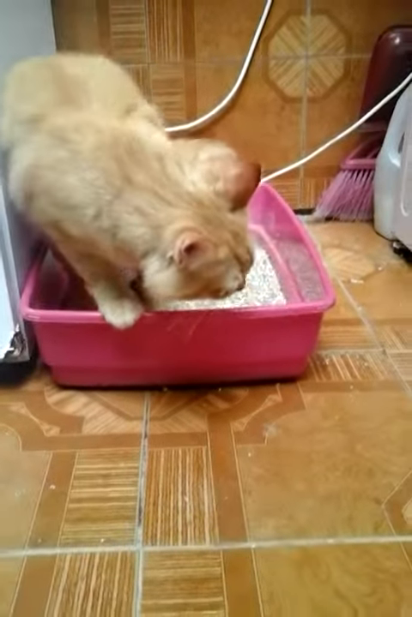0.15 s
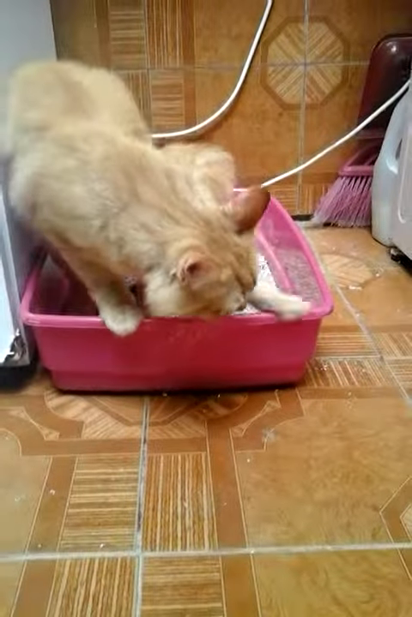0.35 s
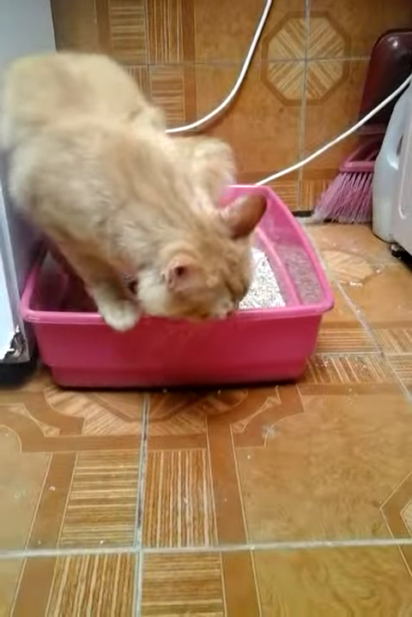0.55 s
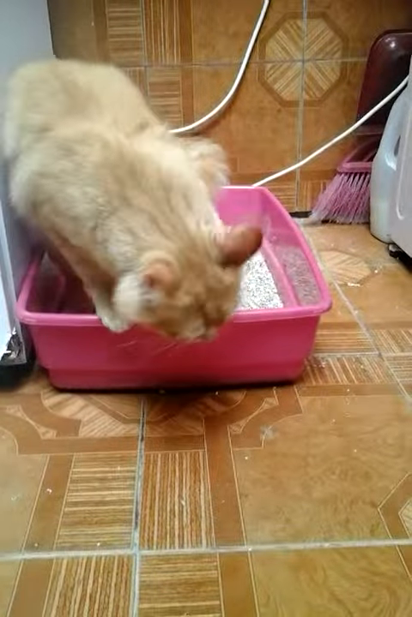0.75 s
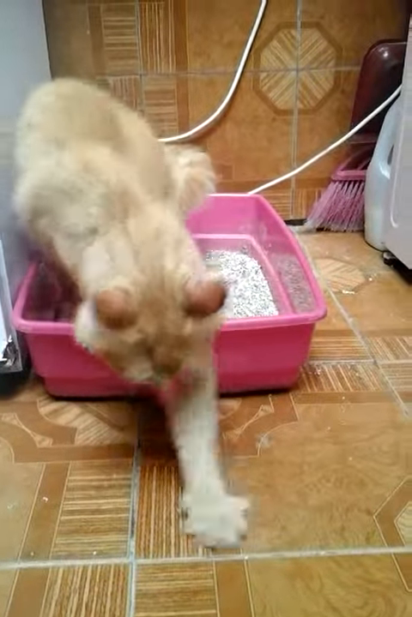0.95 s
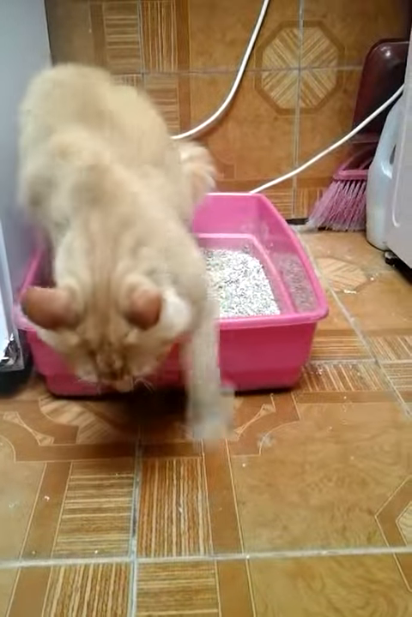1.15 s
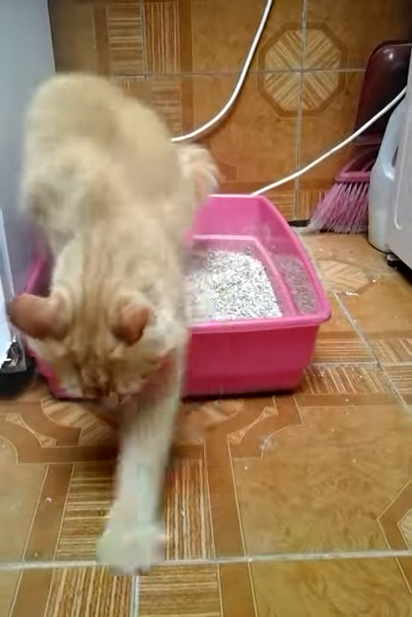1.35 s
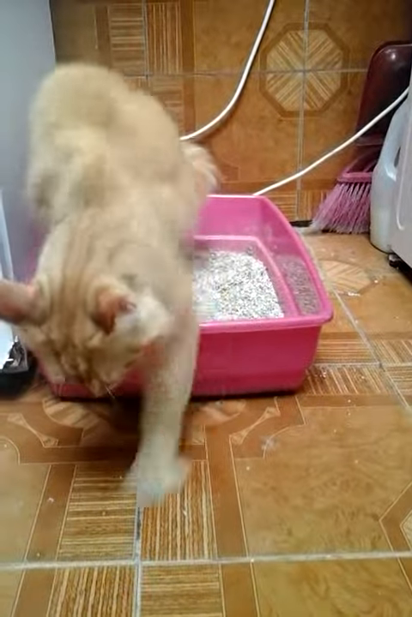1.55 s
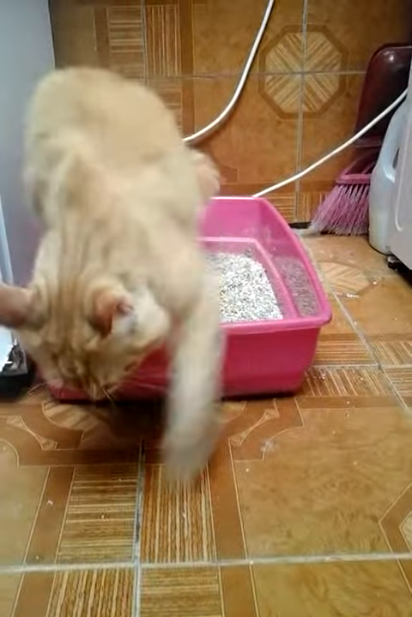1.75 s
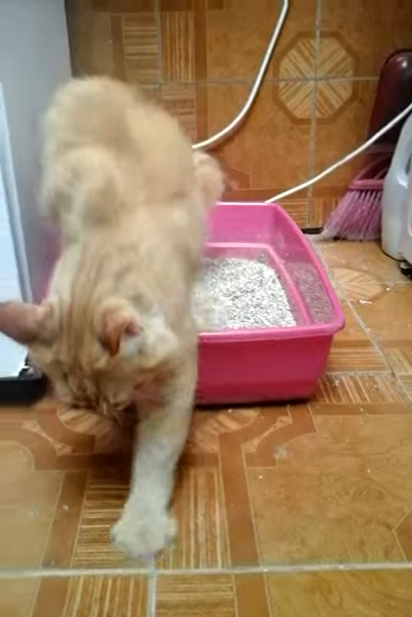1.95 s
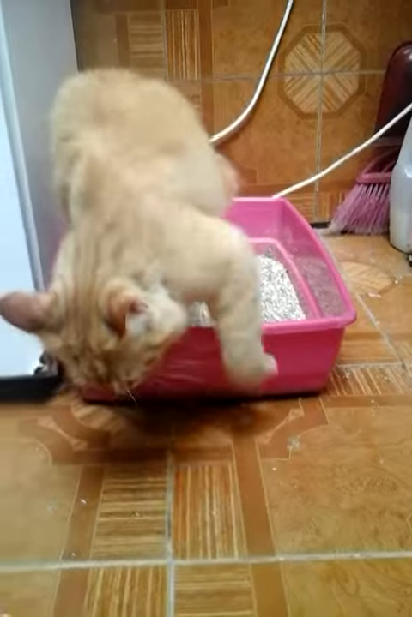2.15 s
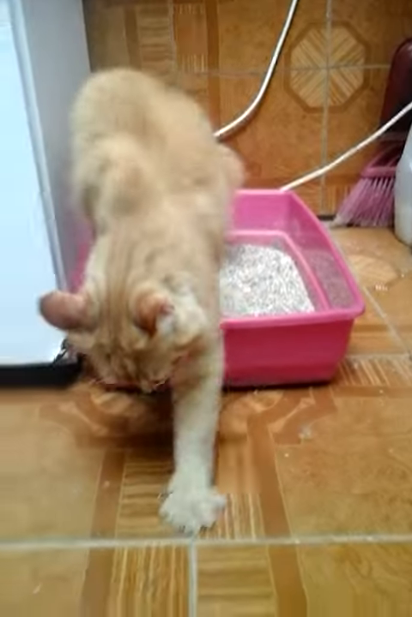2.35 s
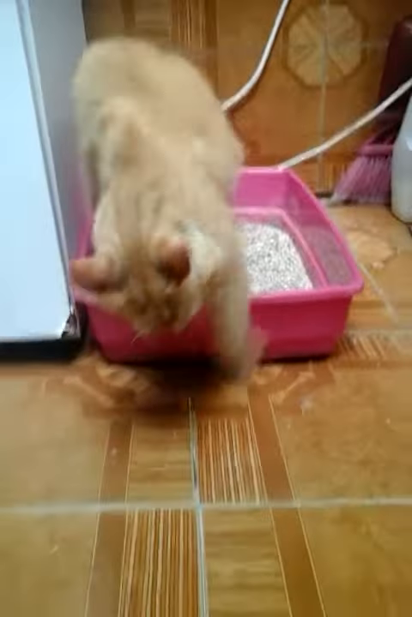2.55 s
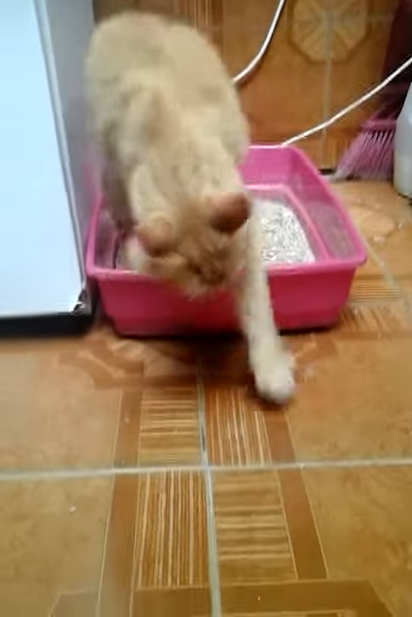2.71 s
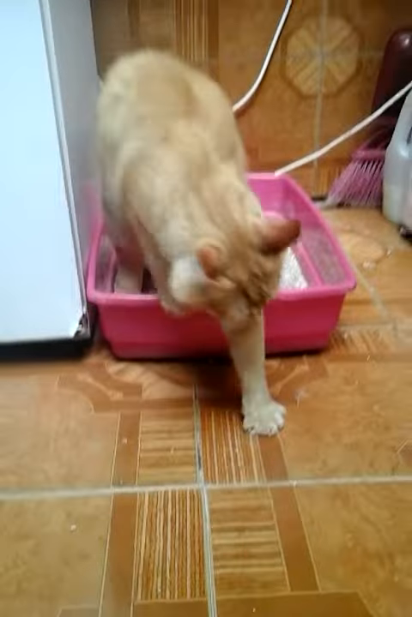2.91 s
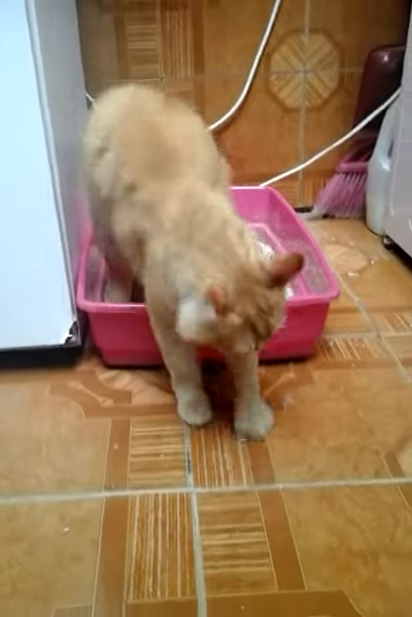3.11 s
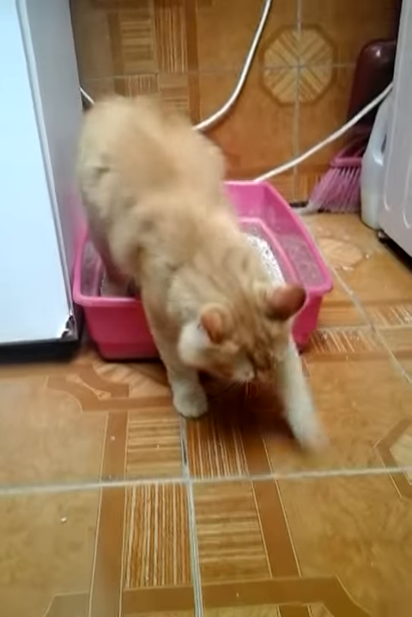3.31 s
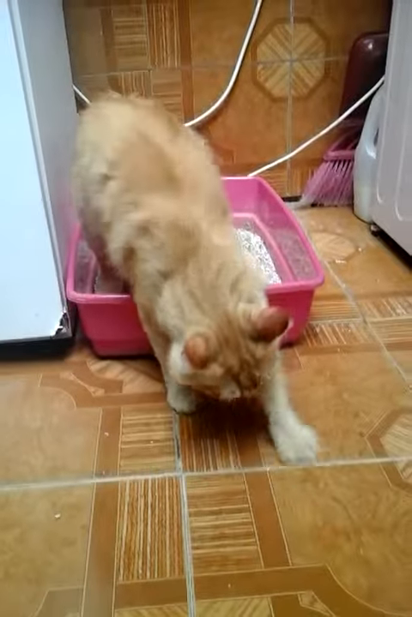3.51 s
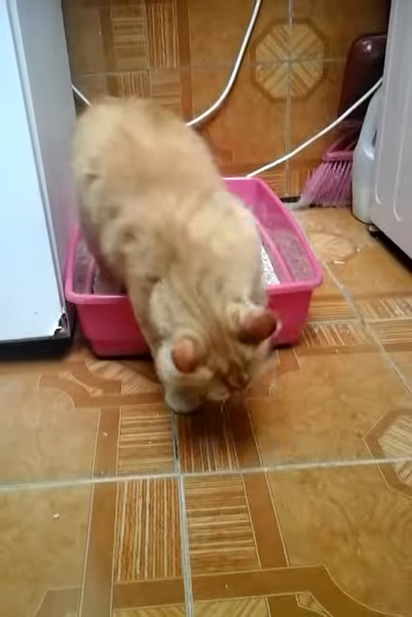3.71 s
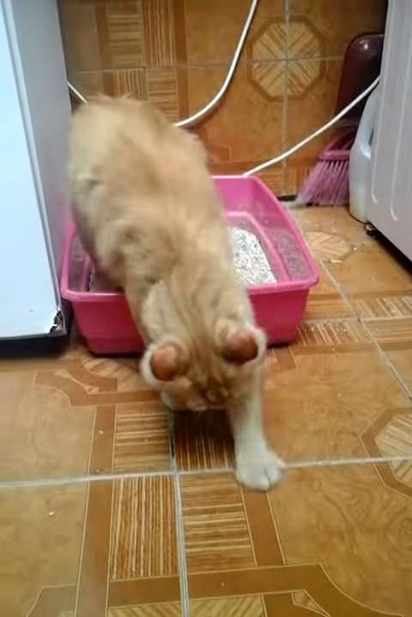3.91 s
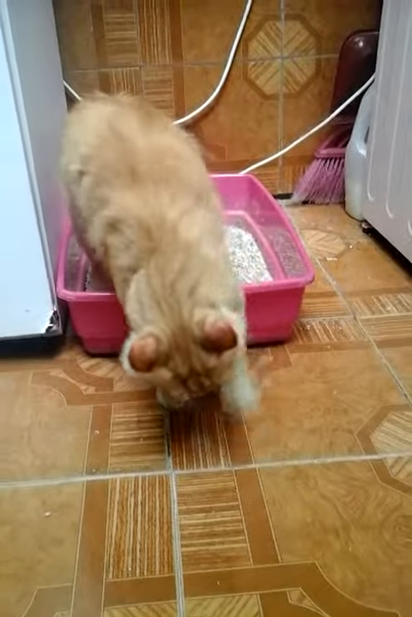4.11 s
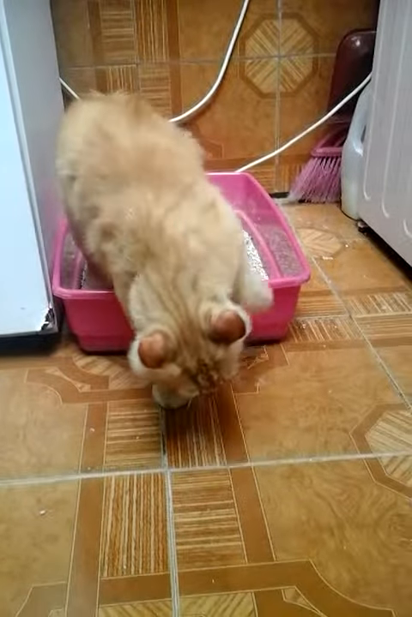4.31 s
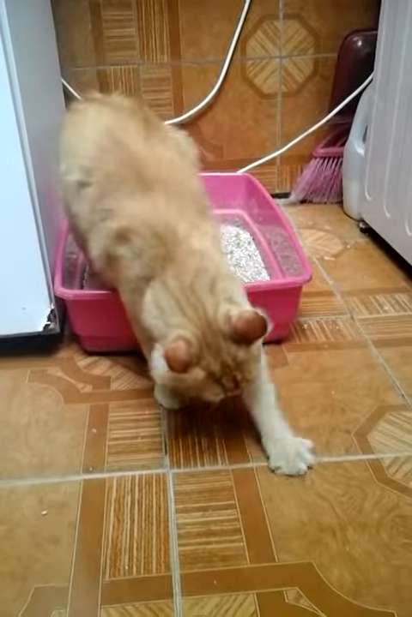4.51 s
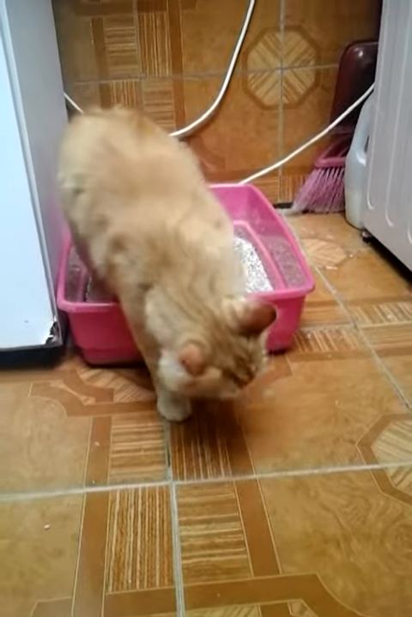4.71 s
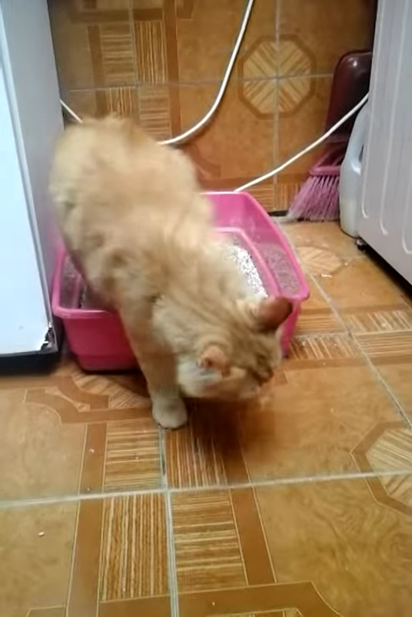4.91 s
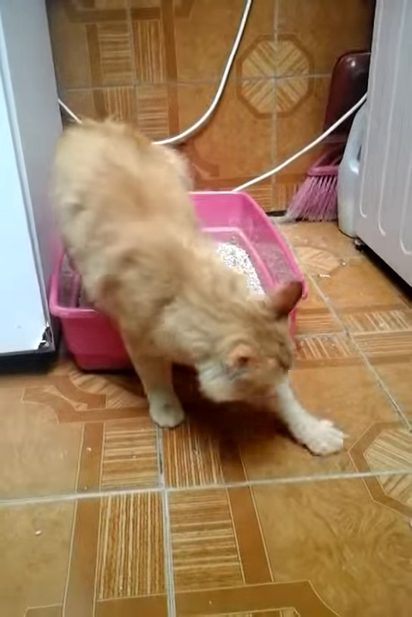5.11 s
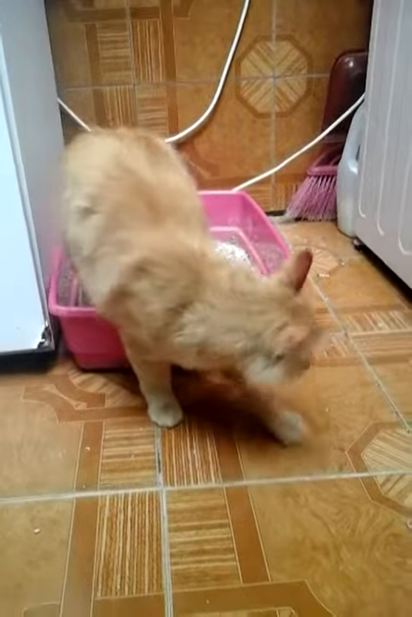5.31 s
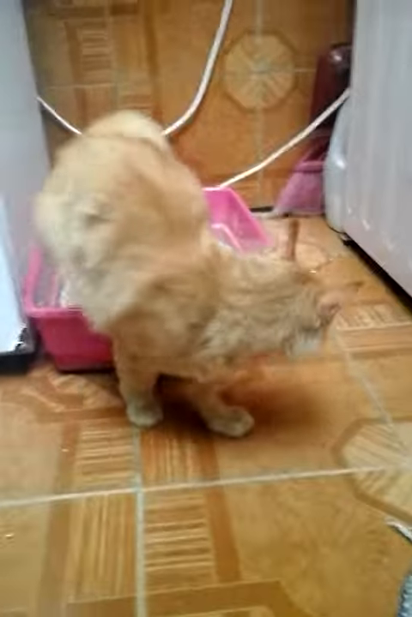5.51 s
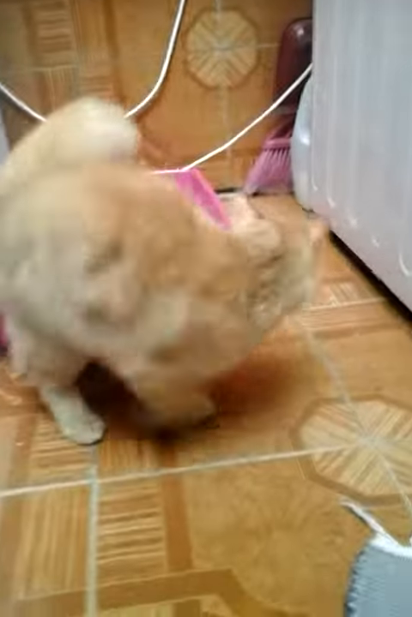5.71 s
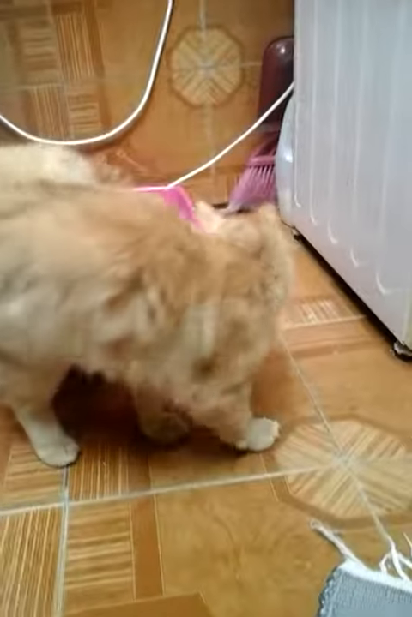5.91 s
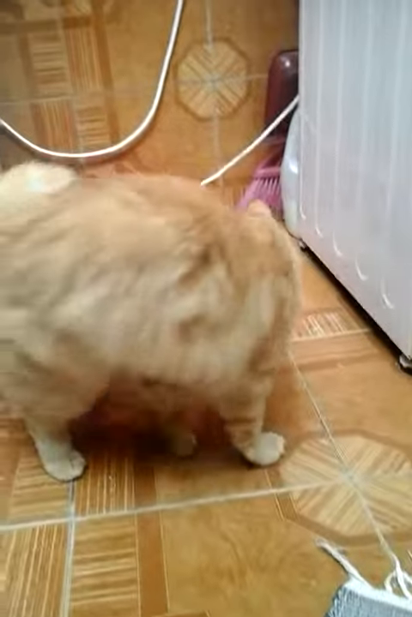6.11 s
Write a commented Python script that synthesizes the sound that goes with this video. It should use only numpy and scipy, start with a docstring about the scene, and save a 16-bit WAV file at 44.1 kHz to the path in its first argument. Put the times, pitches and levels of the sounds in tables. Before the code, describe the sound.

Close up in a small tiled room, a cat briefly crunches litter in a plastic tub. Then its paw sweeps faintly across the tiles, again and again, most strokes ending in a hollow plastic knock. The knocks grow stronger, peaking past the middle, then stop; a few claw taps and a faint scuff follow as it steps out. Low room rumble and slight hiss lie underneath.

```python
"""Cat in a litter tub

A cat in a plastic tub in a small tiled room shuffles litter, then sweeps a paw over the tiles; most sweeps
end in a hollow knock: a soft push filtered by contact and wall, ringing tub modes and room.
Claws are short noise bursts; paw and litter are grains over noise; a low rumble and faint hiss lie below.
Late claw taps and a scuff follow as it steps out. Two microphone ports of opposite polarity hear it."""
import sys
import numpy as np
from scipy import signal
from scipy.fft import rfft, irfft
from scipy.io import wavfile

SR = 44100
rng = np.random.default_rng(int(sys.argv[2]) if len(sys.argv) > 2 else 0)


def to_wav(sig):
    """Store sig (one row per channel, or 1-D mono) as 16-bit WAV at the path in sys.argv[1].

    Samples outside -1..1 are clipped; the rate is SR.
    """
    pcm = np.clip(np.atleast_2d(sig), -1, 1) * 32767
    pcm = np.round(pcm).astype(np.int16)
    wavfile.write(sys.argv[1], SR, pcm.T)  # frames by channels


N = 275757
TIME_S = np.arange(N) / SR
FREQ_HZ = np.maximum(np.fft.rfftfreq(N, 1 / SR), 1)
RING_TIME_S = TIME_S[:SR * 3 // 4]

# Paw blows on the tub, some as contacts a few ms apart:
# start_s, relative_level_db, treble_fall_db_per_octave, wall_spot_hz, spot_lift_db, bottom_share_db
KNOCKS = [(.128, -37.5, 20, 378, 9, 3), (.545, -41, 12, 403, 3, 10), (1.2571, -23.5, 29, 403, 0, 10),
          (1.2621, -19.5, 24.5, 573, -15, 5), (1.7139, -15, 21, 527, 7.5, 8),
          (1.7173, -22, 17, 790, 14.5, -14), (2.0216, -34, 6, 1200, 2, 0),
          (2.1565, -10.5, 39, 740, 7.5, 13), (2.1611, -17, 6.5, 1525, 17, 2),
          (2.6339, -13.5, 25, 830, 4.5, 0), (3.273, -38.5, 20, 270, 6.5, 3),
          (3.6829, -5.5, 11, 1260, 12.5, -6.5), (3.6880, -1.5, 14, 438, 15, -7),
          (3.6894, 0.5, 21.5, 634, 5.5, -7), (4.2238, -3, 12.5, 936, 5.5, 1), (4.7734, -9, 14, 393, 12, -2),
          (4.7750, -17, 19, 612, 10, -1), (4.877, -23, 10, 1110, 8, -3)]
# Tub ring modes: mode_hz, relative_level_db, t60_s
TUB_MODES = [(360, -15, 0.22), (403.2, -15, .3), (533, -20.5, 0.34), (643.4, -1.5, .2), (804, -20.5, 0.62),
             (867, -18, .22), (918, -13.5, 0.26), (1176, -12.5, .27), (1277, -16.5, .3), (1324, -15, .3),
             (1540, -14.5, .12), (1680, -21, .12), (1932, -20.5, 0.28), (2182, -29, .27)]
# Modes of the loaded tub bottom: mode_hz, relative_level_db, t60_s
BOTTOM_MODES = [(181.4, -60, 0.47), (371, -59.5, .23)]
# Contact corner nears FIRM_HZ for firm blows and is half of it at GENTLE_DB
FIRM_HZ, GENTLE_DB = 1083, -34.5

# Claws catch the tub wall: start_s, relative_level_db, time_to_peak_s, left_minus_right_db, pitch_hz
WALL_CLAWS = [(2.156, -27, 0.00087, 0.5, 4730), (3.6787, -27.5, 0.00091, -2, 3400),
              (3.69, -31, 0.0015, 4, 6100), (4.2216, -43, 0.00035, -13, 3160),
              (4.7695, -20.5, 0.00074, 2.5, 6000), (4.8394, -35.5, .0032, 1, 5690)]
# Claws tap tiles or rim: start_s, relative_level_db, time_to_peak_s, left_minus_right_db
TILE_CLAWS = [(0.3545, -45, 0.00064, 1), (1.432, -53, 0.00082, 6), (1.9, -48, 0.0012, 4),
              (2.364, -43.5, .0008, -1), (3.609, -52, 0.0085, 10), (4.964, -30, 0.00054, -10),
              (5.195, -38, 0.00067, -3.5), (5.7866, -48.5, 0.0046, -15), (5.7967, -31.5, 0.00058, -9.5)]
# Granules click in the tub: start_s, relative_level_db, time_to_peak_s, left_minus_right_db
GRANULES = [(0.064, -44, 0.0021, 0), (0.087, -33.5, 0.00034, 10.5), (0.1, -37, 0.00056, 0),
            (0.3748, -41, .00087, -2), (0.505, -45, 0.0009, -3)]
WALL_CLAW_ROOM_DB = 3
TILE_CLAW_HZ, TILE_CLAW_ROOM_DB = 7790, -17
GRANULE_HZ, GRANULE_ROOM_DB = 5750, -5.5

# Paw sweeps over the tiles, gathering speed:
# start_s, length_s, relative_level_db, hiss_above_about_7_khz_db
SWEEPS = [(1.095, .07, -53, 3), (1.185, .05, -58, 5), (1.53, .11, -56, 3), (1.975, .135, -55.5, 3.5),
          (2.46, .08, -57.5, 2), (2.57, .035, -57, 5), (2.61, .14, -59.5, -2.5), (2.76, .09, -68, -1),
          (2.92, .08, -65.5, -5.5), (3.24, .06, -68.5, 5), (3.49, .135, -59, 4), (4.04, .12, -58, 2),
          (4.605, .085, -59.5, 5), (5.48, .1, -72.5, -7), (5.745, 0.044, -58, 3)]
# Paw lands or drags on the tub wall: start_s, length_s, relative_level_db, hiss_above_about_7_khz_db
SCUFFS = [(1.016, 0.039, -63.5, 3), (1.255, 0.0083, -52.5, -1.5), (1.528, 0.031, -57.5, -8),
          (1.71, 0.016, -58.5, 4.5), (2.018, 0.015, -54.5, -10), (2.155, 0.078, -57.5, -0.5),
          (3.187, .025, -64.5, 4.5), (3.43, 0.032, -63.5, 4), (3.69, 0.029, -47, 2.5),
          (4.222, 0.041, -53.5, -2), (4.312, 0.021, -52, -4.5), (4.838, 0.067, -52.5, -1.5),
          (5.19, 0.022, -62.5, 0.5), (6.078, 0.022, -66.5, 0)]
# Paw rub spectrum: freq_hz, gain_db
SWEEP_COLOUR = [(120, -1), (350, 0), (600, -6), (1100, -13), (2800, -12.5), (4200, -7), (4900, -5.5),
                (5450, -0.5), (6200, -3), (7500, -7), (10000, -11.5), (15000, -16.5)]
# Spectrum of the hiss lingering after each rub: freq_hz, gain_db
LINGER_COLOUR = [(150, 10), (330, 3), (1100, -7), (4000, -8), (5400, -4.5), (7500, -6), (15000, -9)]
SWEEP_ATTACK_SHARE, SWEEP_RELEASE_DB_PER_S = 0.95, 168.5
SCUFF_ATTACK_SHARE, SCUFF_RELEASE_DB_PER_S = 0.25, 233
LINGER_DB, LINGER_TIME_CONSTANT_S = 1, 0.28
PAW_LEFT_MINUS_RIGHT_DB = 1

# Paw stirs the litter: start_s, length_s, relative_level_db
STIRS = [(0, 0.051, -58), (.063, 0.044, -51), (.375, 0.064, -58), (.46, 0.092, -59), (.53, 0.016, -58.5)]
# Litter crunch spectrum: freq_hz, gain_db
LITTER_COLOUR = [(60, -8), (170, 9), (400, 0.5), (550, -5), (1000, -7.5), (1500, -10), (3200, -12),
                 (5200, -5), (7500, -8), (10000, -13), (15000, -17.5)]
STIR_ATTACK_SHARE, STIR_RELEASE_DB_PER_S, STIR_LINGER_DB = 0.11, 226, -9

# Tiled room tail by band: centre_hz, t60_s, relative_level_db
ROOM = [(222, 0.94, -2.5), (345, 0.51, 2.5), (505.4, 0.49, -3.5), (893, 0.46, -1), (1735, 0.43, 1),
        (3056, 0.47, -5), (5360, 0.22, -1), (9860, 0.23, -5.5)]
# Quiet room spectrum: freq_hz, gain_db
AIR = [(15, -32), (25, -4.5), (81, -1.5), (264, -13.5), (394, -19), (475, -21), (856, -25.5), (1150, -27.5),
       (1390, -30.5), (1860, -31.5), (2020, -32), (15000, -29.5)]
AIR_DB = -62.5

# Colour of the left microphone port: freq_hz, gain_db
LEFT_PORT = [(300, 0.5), (3500, 1.5), (4600, -4.5), (6800, -1), (10000, -3), (15000, -3.5)]
# Colour of the right microphone port: freq_hz, gain_db
RIGHT_PORT = [(150, -1), (500, -2.5), (1300, 1), (3800, -1.5), (5250, 3), (6200, -2.5), (7800, -5),
              (15000, -3.5)]
TOP_HZ = 14750


def knocks(spot_q=7.6, radiate_hz=290, pad_hz=8000):
    """A soft pad pushes the wall: the harder the blow, the higher the corner of the push."""
    size = 2048
    freq_hz = np.fft.rfftfreq(size, 1 / SR) + 1
    force, load = np.zeros((2, N))
    for start_s, level_db, fall_db, spot_hz, lift_db, bottom_db in KNOCKS:
        corner_hz = FIRM_HZ / (1 + undb(GENTLE_DB - level_db))
        contact = (1 + (freq_hz / corner_hz) ** 4) ** (-fall_db / 24)
        detune = freq_hz / spot_hz - spot_hz / freq_hz
        spot = 1 + (undb(lift_db) - 1) / (1 + 1j * spot_q * detune)
        push = np.roll(irfft(contact * spot), size // 2)
        push = undb(level_db) * push / push.max()
        start = int(start_s * SR) - size // 2
        force[start:start + size] -= push
        load[start:start + size] -= push * undb(bottom_db)
    # A small wall radiates little bass; the loaded bottom thumps on its own
    wall = band(band(force, "high", radiate_hz, order=3), "low", pad_hz)
    bottom = sum(undb(db - 60 * RING_TIME_S / t60_s) * np.sin(2 * np.pi * hz * RING_TIME_S)
                 for hz, db, t60_s in BOTTOM_MODES)
    thump = convolve(load, bottom[None])[0]
    ring = undb(-49.5) * tub_ring(phase_spread_rad=0.72)
    echo = room(early_db=-26.0, early_t60_s=0.19, late_db=-36.5, gap_s=0.0012)
    direct = two_ports(wall + thump, lag_s=0.00006)
    return direct * pan(0.25) + convolve(wall, ring + echo) * pan(0.94)


def tub_ring(phase_spread_rad):
    """Decaying tub modes, each reaching the two opposed ports a little out of step."""
    t = RING_TIME_S
    opposed = np.array([[1], [-1]])
    skews = phase_spread_rad * rng.choice([-1, 1], (len(TUB_MODES), 1, 1)) * opposed
    ring = sum(undb(db - 60 * t / t60_s) * np.cos(2 * np.pi * hz * t + skew)
               for (hz, db, t60_s), skew in zip(TUB_MODES, skews))
    return ring * opposed


def two_ports(x, lag_s):
    """A near sound meets the right port first, then the left one, of opposite polarity."""
    return np.array([np.interp(TIME_S - lag_s, TIME_S, x), -x])


def ticks():
    """A claw or granule skips briefly as a band-limited noise burst, and the tiles echo it."""
    direct, room_send = np.zeros((2, 2, N))
    t = TIME_S[:SR // 25]
    events = [(*row, WALL_CLAW_ROOM_DB) for row in WALL_CLAWS]
    events += [(*row, TILE_CLAW_HZ, TILE_CLAW_ROOM_DB) for row in TILE_CLAWS]
    events += [(*row, GRANULE_HZ, GRANULE_ROOM_DB) for row in GRANULES]
    for start_s, level_db, peak_s, side_db, pitch_hz, room_db in events:
        swell = t / peak_s * np.exp(1 - t / peak_s)
        noise = rng.standard_normal((2, len(t))) * swell
        ring = band(noise, "band", [pitch_hz / 1.47, pitch_hz * 1.16])
        crack = undb(-15) * band(noise, "band", [pitch_hz / 4, pitch_hz * 1.5])
        tick = (ring + crack) / rms(ring + crack) * rms(swell)
        tick = tick * undb(level_db - 5.0) * pan(side_db)
        start = int(start_s * SR)
        direct[:, start:start + len(t)] += tick
        room_send[:, start:start + len(t)] += tick * undb(room_db)
    echo = room(early_db=-31.5, early_t60_s=0.2, late_db=-28.5, gap_s=0.0009)
    return direct + convolve(room_send, echo)


def rubbing():
    """The furry pad rubs with fine grit under it; pressing claws sound darker than brushing fur."""
    pressing, brushing = np.zeros((2, N))
    for table, *shape in ((SWEEPS, SWEEP_ATTACK_SHARE, SWEEP_RELEASE_DB_PER_S),
                          (SCUFFS, SCUFF_ATTACK_SHARE, SCUFF_RELEASE_DB_PER_S)):
        press_rows = [(start_s, length_s, db) for start_s, length_s, db, _ in table]
        brush_rows = [(start_s, length_s, db + hiss_db) for start_s, length_s, db, hiss_db in table]
        pressing = np.hypot(pressing, strokes(press_rows, *shape))
        brushing = np.hypot(brushing, strokes(brush_rows, *shape))
    rub = band(grit(SWEEP_COLOUR, rate_hz=2500, spread_db=2.0, rub_db=1.0), "high", 92)
    rasp = colour(rub, [(6500, 0), (9000, -30)])
    hiss = rub - rasp
    trail = colour(diffuse(N, opposed_hz=600, leak=0.49), LINGER_COLOUR)
    trail = trail / rms(trail) * undb(LINGER_DB) * linger(brushing)
    return (rasp * pressing + hiss * brushing + trail) * pan(PAW_LEFT_MINUS_RIGHT_DB)


def litter():
    """Granules crunch under the paw, settle slowly and set the tub ringing faintly."""
    stir = strokes(STIRS, STIR_ATTACK_SHARE, STIR_RELEASE_DB_PER_S)
    level = np.hypot(stir, undb(STIR_LINGER_DB) * linger(stir))
    crunch = grit(LITTER_COLOUR, rate_hz=510, spread_db=1.5, rub_db=6.5) * level
    return crunch + convolve(crunch[0], undb(-41) * tub_ring(phase_spread_rad=0.35))


def grit(points, rate_hz, spread_db, rub_db):
    """Countless grains of uneven size click over a smooth rub; unit RMS in the treble."""
    sizes = undb(spread_db * np.minimum(rng.exponential(size=N), 3)) * rng.choice([-1, 1], (2, N))
    clicks = sizes * (rng.random(N) < rate_hz / SR)
    echo = room(early_db=-25.0, early_t60_s=0.016, late_db=-33, gap_s=0.003)
    clicks = clicks + convolve(clicks, echo)
    rub = undb(rub_db) * diffuse(N, opposed_hz=605, leak=0.36)
    sound = colour(clicks / rms(clicks) + rub, points)
    return sound / rms(band(sound, "high", 4000, order=4))


def strokes(rows, attack_share, release_db_per_s):
    """Each stroke swells over a share of its length, holds and dies away; powers add."""
    power = np.zeros(N)
    for start_s, length_s, level_db in rows:
        attack = np.clip((TIME_S - start_s) / (attack_share * length_s), 0, 1)
        past_end_s = np.maximum(TIME_S - start_s - length_s, 0)
        power += (undb(level_db - release_db_per_s * past_end_s) * attack) ** 2
    return np.sqrt(power)


def linger(level):
    """A level that follows the strokes sluggishly and fades slowly."""
    keep = np.exp(-1 / (LINGER_TIME_CONSTANT_S * SR))
    return signal.lfilter([1 - keep], [1, -keep], level)


def room(early_db, early_t60_s, late_db, gap_s):
    """Close walls answer after a short gap; a darker tail decays band by band."""
    t = RING_TIME_S
    centre_hz, t60_s, level_db = np.transpose(ROOM)
    spectrum = rfft(diffuse(len(t), opposed_hz=990, leak=0.47))
    log_hz = np.log(np.fft.rfftfreq(len(t), 1 / SR) + 1)
    tail = 0
    for share, decay_s, db in zip(np.eye(len(centre_hz)), t60_s, level_db):
        weight = np.interp(log_hz, np.log(centre_hz), share)
        tail = tail + irfft(spectrum * weight, len(t)) * undb(db - 60 * t / decay_s)
    early = diffuse(len(t), opposed_hz=1110, leak=0.38) * undb(-60 * t / early_t60_s)
    return (undb(early_db) * early + undb(late_db) * tail) * np.clip(t / gap_s - 1, 0, 1)


def air():
    """Low room rumble and a faint even hiss: steady coloured noise."""
    noise = colour(diffuse(N, opposed_hz=294, leak=0.4), AIR)
    return noise / rms(noise) * undb(AIR_DB) * pan(0.8)


def diffuse(size, opposed_hz, leak):
    """Noise at two ports of opposite polarity: partly mirrored in the bass, unrelated in the treble."""
    mid, side = rng.standard_normal((2, size))
    mid = leak * mid + (1 - leak) * band(mid, "high", opposed_hz, order=1)
    return (mid + side * np.array([[1], [-1]])) / np.sqrt(2)


def undb(db):
    """Decibels to gain."""
    return 10 ** (np.asarray(db) / 20)


def pan(left_minus_right_db):
    """Left and right gains for a level difference."""
    return undb(np.array([[0.5], [-0.5]]) * left_minus_right_db)


def colour(x, points):
    """Filter by a (freq_hz, gain_db) spectrum, interpolated over log frequency."""
    hz, db = np.transpose(points)
    return irfft(rfft(x) * undb(np.interp(np.log(FREQ_HZ), np.log(hz), db)), N)


def band(x, kind, hz, order=2):
    """Butterworth filter."""
    edges_hz = np.clip(hz, 10, 0.45 * SR)
    return signal.sosfilt(signal.butter(order, edges_hz, kind, fs=SR, output="sos"), x)


def rms(x):
    """Root mean square."""
    return np.sqrt(np.mean(x ** 2))


def convolve(x, response):
    """Play a sound through a response of one or two channels."""
    return signal.fftconvolve(np.atleast_2d(x), response, axes=1)[:, :N]


def scene():
    """Cat, tub and room together."""
    return knocks() + ticks() + rubbing() + litter() + air()


def record(dry):
    """Each microphone port has its own resonance; the top is cut."""
    ports = np.array([colour(dry[0], LEFT_PORT), colour(dry[1], RIGHT_PORT)])
    return signal.sosfilt(signal.ellip(10, 0.2, 70, TOP_HZ, fs=SR, output="sos"), ports)


dry = scene()
out = record(dry)
to_wav(out)
```